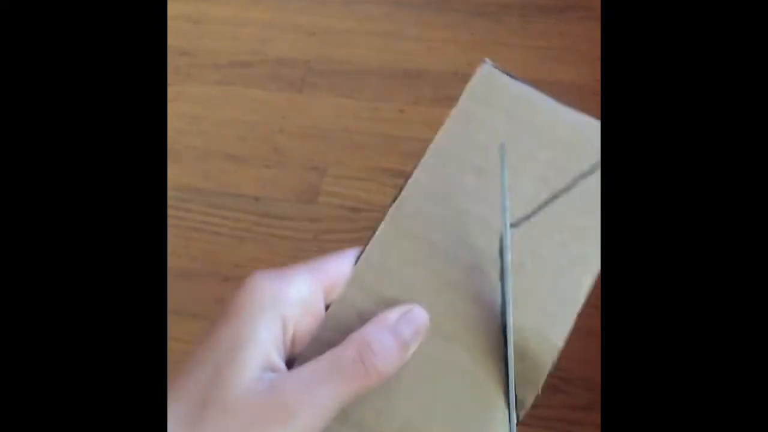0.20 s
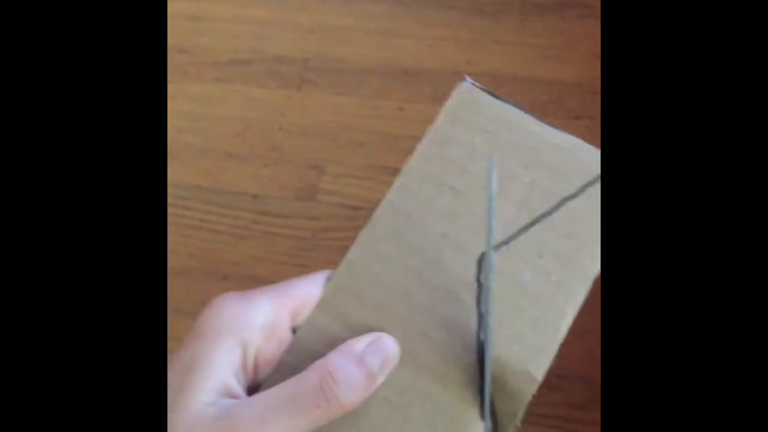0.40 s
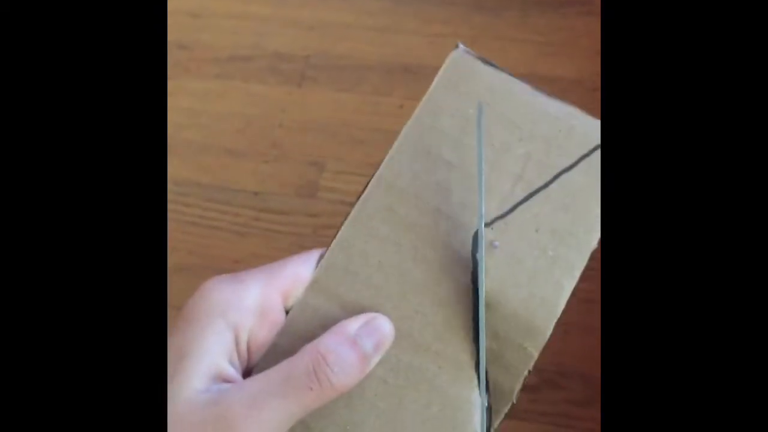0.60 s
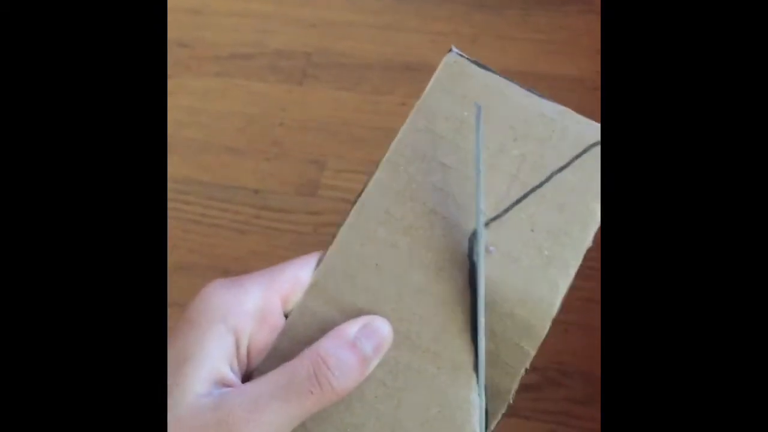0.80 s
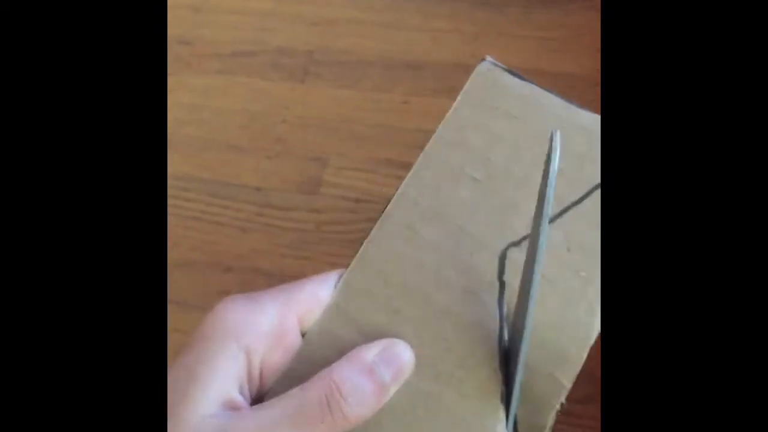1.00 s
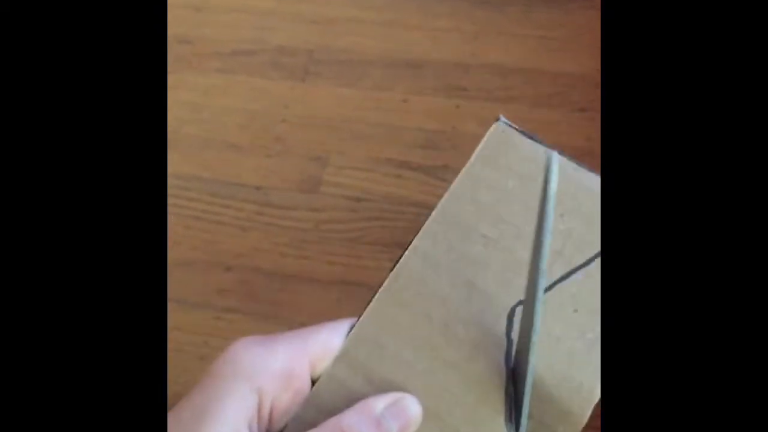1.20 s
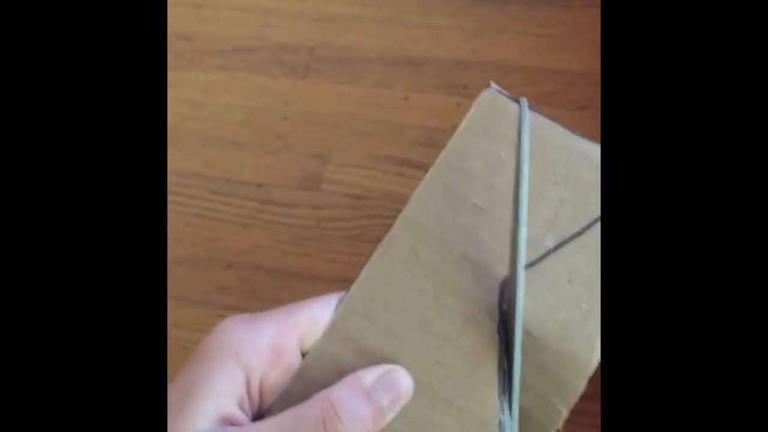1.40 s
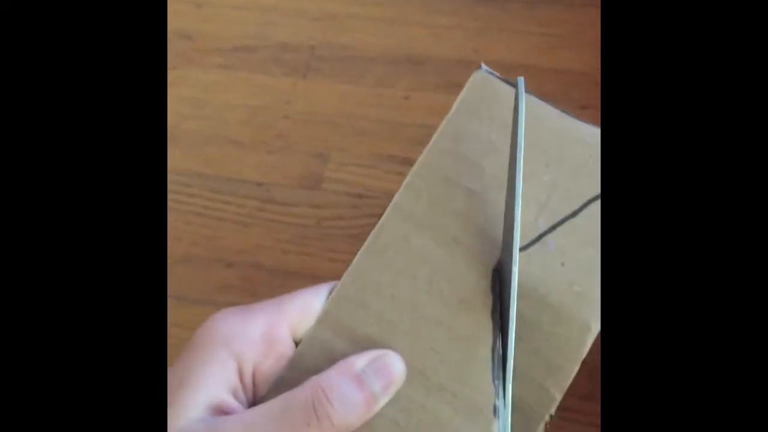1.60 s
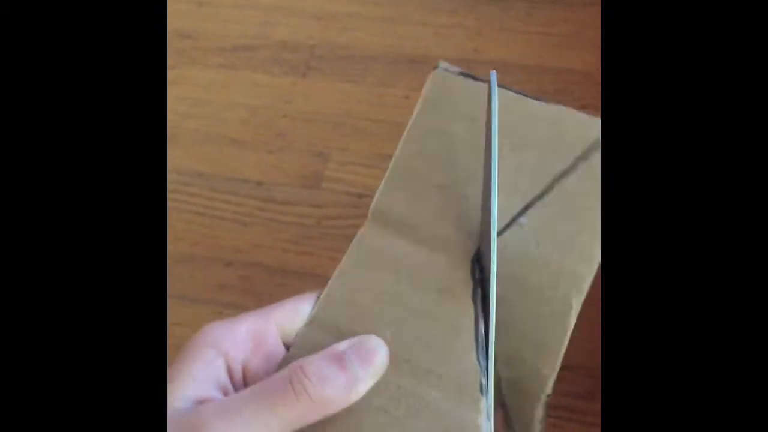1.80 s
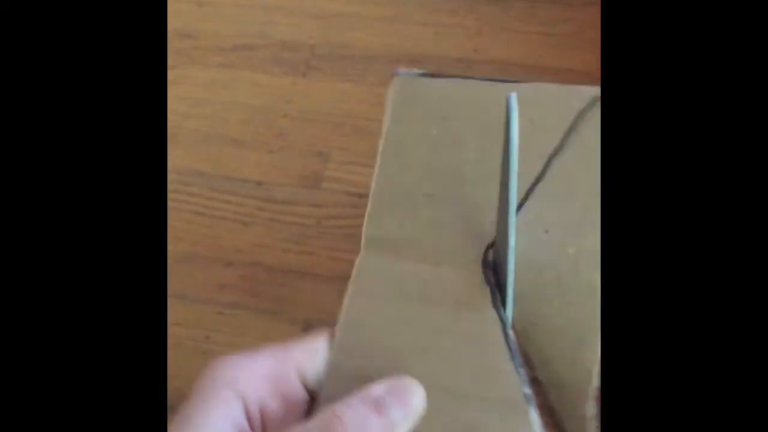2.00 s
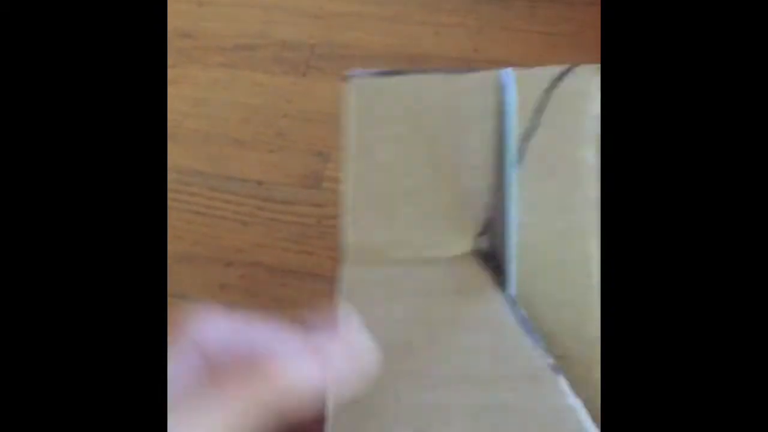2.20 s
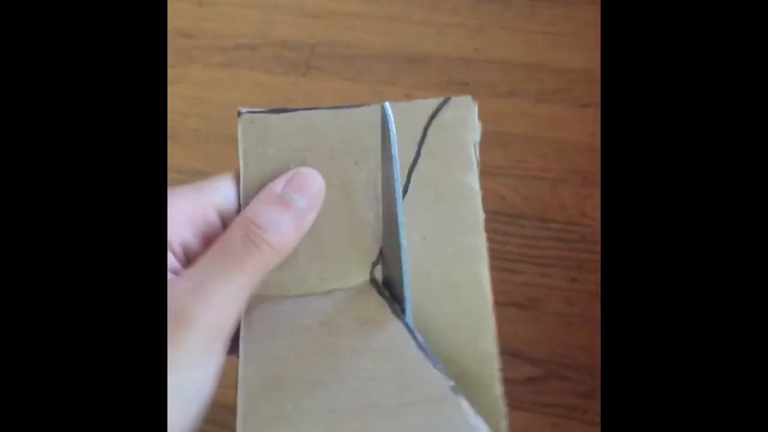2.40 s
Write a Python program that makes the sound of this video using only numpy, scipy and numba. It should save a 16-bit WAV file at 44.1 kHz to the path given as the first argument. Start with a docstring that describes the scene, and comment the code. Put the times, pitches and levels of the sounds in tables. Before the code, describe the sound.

Scissors cutting corrugated cardboard, close up in a small quiet room: a blade scrape, a crackling snip, sliding rasp and a sharp clack, a second crunchier snip, then fingers rub and the board bumps and squeaks.

```python
"""Scissors through corrugated cardboard

Scissors cut board close up in a small quiet room: blades slide in the slit as rasp and hiss made of
random slips, then close in two strokes of crackle, with bursts of fractures ringing the sheet's moving
resonances. Flutes buckle and single fibres tick as filtered noise grains. At the end the hand shifts
its grip: the board bumps as decaying sines, rubs as coloured grain and squeaks as short rising tones."""
import sys
import numpy as np
from scipy import signal
from scipy.fft import rfft, irfft, next_fast_len
from scipy.io import wavfile
from scipy.ndimage import map_coordinates
from numba import njit

SR = 44100
rng = np.random.default_rng(int(sys.argv[2]) if len(sys.argv) > 2 else 0)


def put_to_file(sound):
    """Save the sound as 16-bit audio at rate SR, in the file named by the first command-line argument."""
    columns = np.atleast_2d(sound).T  # one column per channel
    safe = np.clip(columns, -1, 1)
    whole_steps = np.round(safe * 32767)
    wavfile.write(sys.argv[1], SR, whole_steps.astype(np.int16))


N = 110250
T = np.arange(N) / SR  # s
TOP_HZ = 16100
CLUMP_HZ = 318  # knots a second in the cutting, sliding and squeak roughness


def amp(db):
    """Decibels to gain."""
    return 10 ** (np.asarray(db) / 20)


def unit(x):
    """Scale to rms 1."""
    return x / np.sqrt(np.mean(x ** 2) + 1e-20)


def level(strokes, axis=1):
    """Gain per sample from one dB column of each stroke, practically silent between strokes."""
    gain = np.zeros(N)
    for stroke in map(np.array, strokes):
        gain += amp(np.interp(T, stroke[:, 0], stroke[:, axis], left=-140, right=-140))
    return gain


def swells(rows):
    """Gain per sample of bell-shaped swells."""
    return sum(amp(db) * np.exp(-((T - s) / half) ** 2) for s, half, db in rows)


def burst(s, length):
    """Swell, hold and release of one failure; longer ones build up and die more slowly."""
    rise = .00008 + .15 * length  # s
    fall = .0003 + .15 * length  # s
    before, after = np.minimum(T - s, 0), np.maximum(T - s - length, 0)
    return np.exp(before / rise - after / fall)


def wobble(rate):
    """A smooth random curve, rate knots a second."""
    knots = rng.standard_normal(int(N * rate / SR) + 4)
    return map_coordinates(knots, [T * rate])


def clumps(depth_db, rate):
    """Random gain of rms 1 that gathers grains into clumps."""
    return unit(amp(depth_db * wobble(rate)))


def cracks(rate, scatter_db):
    """Tiny fractures or slips, rate a second, at random times with scattered sizes, rms 1."""
    happens = rng.random(N) < rate / SR
    sign = np.sign(rng.standard_normal(N))
    size = amp(scatter_db * np.clip(rng.standard_normal(N), -2, 2))
    return unit(happens * sign * size)


def colour(x, points):
    """Causal filter through (f/Hz, level/dB) points that keeps the power of white noise."""
    size = next_fast_len(N + SR // 2, True) * 2
    hz, db = np.transpose(points)
    log_f = np.log(np.fft.rfftfreq(size, 1 / SR) + 1)
    gain = unit(amp(np.interp(log_f, np.log(hz), db)))
    # Folding the cepstrum makes the filter minimum phase
    cep = irfft(np.log(gain))
    cep[1:size // 2] *= 2
    cep[size // 2 + 1:] = 0
    return irfft(rfft(x, size) * np.exp(rfft(cep)))[:N]


@njit
def resonate(x, turn, q):
    """A resonance whose centre (radians a sample) moves; gain 1 at the peak."""
    y, low, band = np.zeros(len(x)), 0., 0.
    for i in range(len(x)):
        low += turn[i] * band
        band += turn[i] * (x[i] - low - band / q)
        y[i] = band / q
    return y


def steep_resonance(x, hz, q):
    """The same moving resonance twice in a row, for steep skirts."""
    turn = 2 * np.pi * hz / SR
    return resonate(resonate(x, turn, float(q)), turn, float(q))


# The board stiffens as it is bent, so its creak rises: (t/s, f/Hz)
CREAK_PITCH = [(2.12, 368), (2.21, 710)]


def creak(grain):
    """Rubbing grain excites a broad resonance that climbs as the board bends."""
    return amp(14.5) * steep_resonance(grain, np.interp(T, *np.transpose(CREAK_PITCH)), q=1.43)


# Dull grain, one list a stroke: first a grainy tail fading after the blades' jerk, then fingers rubbing the
# board: (t/s, level before colour/dB)
GRAIN_STROKES = [
    [(1.13, -56), (1.23, -70.5), (1.27, -52), (1.3, -86)],
    [(2.0, -60.5), (2.065, -60), (2.075, -42), (2.12, -46), (2.15, -41), (2.2, -43.5), (2.27, -69.5)],
]
# Fingertips brushing lightly: (middle t/s, half length/s, level before colour/dB)
BRUSH_SWELLS = [(.01, 0.038, -53), (.09, .02, -53), (2.04, 0.014, -51.5), (2.351, .041, -55)]
# Dull colour of the rubbing grain: (f/Hz, relative level/dB)
GRAIN_COLOUR = [(100, 4.5), (400, -5), (1050, -0.5), (1700, -5), (3000, -3), (5000, -13.5), (8500, -10),
                (16000, -18.5)]
# Airy colour of the light brushes: (f/Hz, relative level/dB)
BRUSH_COLOUR = [(500, -8.5), (2000, -3.5), (5000, -14.5), (8500, -5), (16000, -4)]


def rubbing():
    """A dull grainy tail fades after the blades' jerk; later fingers drag on the paper face, or only brush it;
    the board creaks under the last rub."""
    def grain():
        return cracks(7000, scatter_db=5.5) * clumps(2.4, 180)

    drag = colour(level(GRAIN_STROKES) * grain(), GRAIN_COLOUR)
    brush = colour(swells(BRUSH_SWELLS) * grain(), BRUSH_COLOUR)
    return drag + creak(level(GRAIN_STROKES[1:]) * grain()) + brush


# Blades sliding in the slit, one list a slide: (t/s, rasp level before trim/dB, hiss level before trim/dB)
SLIDE_STROKES = [
    [(.186, -47.5, -55), (.2, -36.5, -41), (.28, -37.5, -45), (.325, -34.5, -43), (.365, -34, -52.5),
     (.4, -41.5, -69), (.43, -72, -82)],
    [(.916, -47, -49.5), (.934, -29.5, -36.5), (.952, -39, -63), (.98, -30, -52), (1.025, -39, -43.5),
     (1.05, -44.5, -56), (1.072, -69, -84)],
    [(1.097, -44, -62), (1.107, -21.5, -24), (1.116, -23.5, -29), (1.122, -19, -25), (1.137, -57, -64)],
    [(1.85, -65, -65), (1.91, -52, -46), (1.925, -64.5, -66), (1.953, -36.5, -40.5), (1.982, -41.5, -37.5),
     (2.003, -67, -68)],
]
# The blade binding in the slit: (middle t/s, half length/s, level before colour/dB)
CHATTER_SWELLS = [(.331, 0.032, -35)]
# Colour of the rasp in the board: (f/Hz, relative level/dB)
RASP_COLOUR = [(40, -18.5), (110, -16.5), (450, -30), (680, -7.5), (880, -16.5), (1150, -5.5), (1380, -6),
               (1800, -2.5), (2300, -8.5), (3200, -13), (4600, -19), (9000, -24.5)]
# Colour of the hiss at the surface: (f/Hz, relative level/dB)
HISS_COLOUR = [(1500, -78), (4500, -1), (8000, 5), (9500, 7.5), (10800, -0.5), (13500, 0.5), (16000, -11)]
# Colour of the binding blade: (f/Hz, relative level/dB)
CHATTER_COLOUR = [(1400, -32.5), (2200, 1), (2600, -10.5), (3400, -8.5), (4600, -39.5)]
RASP_TRIM_DB, HISS_TRIM_DB = -3.5, -1


def sliding():
    """Steel drags over the cut edges: slips rasp in the board, hiss on top, chatter where it binds."""
    def slips():
        return cracks(11000, scatter_db=3) * clumps(2.2, CLUMP_HZ)

    rasp = amp(RASP_TRIM_DB) * colour(level(SLIDE_STROKES) * slips(), RASP_COLOUR)
    chatter = colour(swells(CHATTER_SWELLS) * slips(), CHATTER_COLOUR)
    hiss = amp(HISS_TRIM_DB) * colour(level(SLIDE_STROKES, axis=2) * slips(), HISS_COLOUR)
    return rasp + chatter + hiss


# The board buckling with a dull crunch: (t/s, length/s, level before colour/dB)
BUCKLE_EVENTS = [(0.224, 0.0059, -47), (1.113, 0.011, -32.5), (1.578, .003, -38.5), (1.629, 0.0047, -29.5),
                 (1.652, 0.11, -45.5), (1.703, 0.0052, -34), (1.746, 0.0027, -40), (1.964, 0.032, -50),
                 (2.459, 0.0098, -46)]
# Colour of the hollow board: (f/Hz, relative level/dB)
HOLLOW_COLOUR = [(40, -10), (130, 4), (450, -4.5), (750, 1), (1200, -4), (2000, -14.5), (3500, -20.5)]


def buckling():
    """Flutes fold flat in bursts of fractures and sound the hollow board."""
    folding = sum(amp(db) * burst(s, length) for s, length, db in BUCKLE_EVENTS)
    return colour(folding * cracks(6000, scatter_db=2.5), HOLLOW_COLOUR)


# Colour of fractures in the stiff board: (f/Hz, relative level/dB)
BOARD_COLOUR = [(600, -3.5), (900, -8.5), (1300, -6.5), (1800, 3), (2400, -1.5), (3100, 1.5), (4500, -10.5),
                (8000, -7.5), (16000, -23.5)]


def crunch(force):
    """The stiff board radiates small fractures only above its low cut at 800 Hz."""
    low_cut = signal.butter(6, 800, "high", fs=SR, output="sos")
    return signal.sosfilt(low_cut, colour(force, BOARD_COLOUR))


# Bright colour of parting fibres: (f/Hz, relative level/dB)
FIBRE_COLOUR = [(1500, -44), (4000, 4), (5000, -2), (6200, 5.5), (7200, 3), (8600, 11), (10500, 7.5),
                (13000, 9.5), (16000, 2.5)]


def splinter(force):
    """The fibres themselves radiate the treble of each fracture."""
    return colour(force, FIBRE_COLOUR)


# Single fibres cracking: (t/s, strength before colour/dB, treble relative to strength/dB)
FIBRE_TICKS = [(0.2251, -5, -26), (0.261, -16, -6), (.4818, -9, -6), (.708, -7.5, -2), (0.9728, -9.5, -14),
               (1.4822, -14, 10), (1.5792, -9, 5.5), (1.7252, -17, 7.5), (2.0707, -28.5, 13),
               (2.0894, -17, -15), (2.4582, -12, -5.5)]


def ticks():
    """Single fibres part with a sharp crack and brief splintering, too light to ring the sheet."""
    body, treble, t = np.zeros(N), np.zeros(N), T[:SR // 100]
    for s, db, treble_db in FIBRE_TICKS:
        tail = rng.standard_normal(len(t)) * np.exp(-t / .0005) * (t > 0)
        crack = (t == 0) + amp(-10) * tail
        crack *= amp(db) / np.linalg.norm(crack)
        start = round(s * SR)
        body[start:][:len(t)] += crack
        treble[start:][:len(t)] += amp(treble_db) * crack
    return crunch(body) + splinter(treble)


# The sheet's main resonance as the blades advance: (t/s, f/Hz)
SHEET_PITCH = [(.48, 690), (.55, 760), (.61, 830), (.655, 1020), (.72, 1060), (.755, 1000), (1.42, 950),
               (1.45, 1050), (1.52, 1070), (1.6, 965)]


def sheet(force, ratio, q):
    """One bending resonance of the sheet, at a fixed ratio to its moving main pitch."""
    return steep_resonance(force, ratio * np.interp(T, *np.transpose(SHEET_PITCH)), q)


# Flutes giving way:
# (t/s, length/s, level before colour/dB, treble over that level/dB, sheet ring over that level/dB)
FLUTE_SNAPS = [(0.554, 0.017, -38, 8, -14), (0.604, 0.019, -34.5, -12, 1.5), (.633, 0.0095, -27.5, 0, -3.5),
               (0.65, 0.01, -40.5, -12, 6), (0.6903, 0.0061, -35, -9, 6.5), (.7156, 0.0065, -33.5, -4, 0.5),
               (0.746, 0.0071, -42.5, -3, -5), (1.364, 0.0064, -52, 8.5, -23),
               (1.4153, 0.0068, -35, 4.5, 0), (1.4416, 0.0032, -39.5, 3, 1), (1.4603, 0.0045, -35, 0, -3),
               (1.487, 0.0084, -35, 3.5, 2.5), (1.5122, 0.0048, -34.5, -2.5, 9),
               (1.525, 0.014, -44, 4.5, 2), (1.56, 0.0061, -41.5, -1, 7), (1.6312, 0.0041, -20.5, -1.5, 0),
               (1.7017, 0.0049, -29.5, 2, 1)]


def snap_gains():
    """Gains of the bursting flutes for the board's body, the treble and the sheet's ring."""
    gains = np.zeros((3, N))
    for s, length, db, treble_db, ring_db in FLUTE_SNAPS:
        gains += np.outer(amp(db + np.array([0, treble_db, ring_db])), burst(s, length))
    return gains


# Closing strokes of the blades, one list a stroke: (t/s, crackle level before trim/dB)
CUT_STROKES = [
    [(.45, -63.5), (.475, -47), (.50, -47.5), (.54, -40.5), (.62, -40), (.68, -46.5), (.73, -46),
     (.77, -51.5), (.805, -68)],
    [(1.375, -63), (1.41, -46), (1.5, -47), (1.6, -50.5), (1.65, -43.5), (1.69, -47.5), (1.742, -46),
     (1.765, -68), (1.82, -78)],
]
# Higher resonances of the sheet: (ratio to the main one, gain/dB)
SHEET_OVERTONES = [(1.501, 5.5), (3.05, 3.5)]
CUT_TRIM_DB, CUT_TREBLE_DB = -2, 3
SHEET_DB, FLEX_DB, THUD_DB = 15, 11.5, 12.5
SHEET_Q, FLEX_Q = 5, 3.6
THUD_HZ = 157


def cutting():
    """Crackle and bursts of fractures sound directly and ring the sheet, which also flexes and thuds."""
    effort = amp(CUT_TRIM_DB) * level(CUT_STROKES) * clumps(2.5, CLUMP_HZ)
    body, treble, ring = snap_gains()

    def crackle():
        return effort * cracks(3600, scatter_db=6)

    def tear():
        return cracks(14000, scatter_db=2.5) * clumps(3, 700)

    direct = crunch(crackle() + body * tear())
    main = amp(SHEET_DB) * sheet(crackle() + ring * tear(), 0.98, SHEET_Q)
    flex = amp(FLEX_DB) * sheet(crackle() + ring * tear(), .245, FLEX_Q)
    high = np.zeros(N)
    for ratio, db in SHEET_OVERTONES:
        high += amp(db) * sheet(crackle() + body * tear(), ratio, SHEET_Q)
    thud_filter = signal.butter(6, THUD_HZ, fs=SR, output="sos")
    thud = amp(THUD_DB) * signal.sosfilt(thud_filter, crackle())
    fibres = splinter(amp(CUT_TREBLE_DB) * crackle() + treble * tear())
    return direct + main + flex + high + thud + fibres


# The sheet flapping or thumping in the hand: (t/s, f/Hz, level before rise and decay/dB, t60/s)
SHEET_BUMPS = [(1.118, 89, -19, 0.046), (1.418, 225, -32.5, 0.055), (1.635, 75, -38.5, 0.27),
               (2.04, 49.4, -33.5, 0.26), (2.082, 46.3, -28, .12), (2.466, 106, -34, 0.11)]


def bumps():
    """The whole sheet swings freely as a sine and dies away."""
    out = np.zeros(N)
    for s, hz, db, t60 in SHEET_BUMPS:
        t = np.maximum(T - s, 0)
        rise = 1 - np.exp(-t / .003)
        decay = np.exp(-np.log(1000) * t / t60)
        out += amp(db) * np.sin(2 * np.pi * hz * t) * decay * rise
    return out


# The board catching and squeaking:
# (middle t/s, half length/s, f at the middle before wander/Hz, peak level before roughness/dB)
BOARD_SQUEAKS = [(1.892, .02, 780, -52.5), (2.09, 0.0051, 445, -33.5), (2.151, 0.0039, 1040, -39),
                 (2.182, .006, 630, -34.5), (2.2004, 0.0054, 703, -21), (2.467, 0.0056, 514, -43.5)]
SQUEAK_RISE_HZ_PER_S = 3000


def squeaks():
    """Brief stick-slip tones whose unsteady pitch climbs."""
    out = np.zeros(N)
    wander = .55 * wobble(260)  # phase, radians
    for s, half, hz, db in BOARD_SQUEAKS:
        t = T - s
        phase = 2 * np.pi * (hz + SQUEAK_RISE_HZ_PER_S * t / 2) * t + wander
        out += amp(db) * np.exp(-(t / half) ** 2) * np.sin(phase)
    roughness = amp(1 * wobble(CLUMP_HZ))  # 1 dB deep
    return out * roughness


ROOM_T60_S, ROOM_TOP_HZ = 0.17, 5270


def room(x):
    """A short dull answer from the table and walls: decaying noise through a gentle treble cut."""
    t = T[:SR // 2]
    decay = np.exp(-np.log(1000) * t / ROOM_T60_S)
    tail = rng.standard_normal(len(t)) * decay * (t > .003)
    tail = signal.lfilter(*signal.butter(1, ROOM_TOP_HZ, fs=SR), tail)
    return signal.fftconvolve(x, tail / np.linalg.norm(tail))[:N]


# Colour of the room's low rumble: (f/Hz, relative level/dB)
FLOOR_COLOUR = [(20, -13), (45, -5.5), (80, .5), (130, -2.5), (220, -16.5), (450, -25.5), (800, -21.5),
                (16000, -33)]
ROOM_DB = -18.5
FLOOR_DB = -60.5  # before the low cut


def scene():
    """Scissors, board and hand over the room's low rumble."""
    near = rubbing() + sliding() + buckling() + ticks() + cutting() + bumps() + squeaks()
    rumble = amp(FLOOR_DB) * colour(rng.standard_normal(N), FLOOR_COLOUR)
    return (near + amp(ROOM_DB) * room(near) + rumble)[None]


def record(dry):
    """The recorder rolls off the deepest bass and keeps nothing above its band limit."""
    size = next_fast_len(N + SR // 2)
    low_cut = signal.butter(4, 42, "high", fs=SR, output="sos")
    dry = signal.sosfilt(low_cut, dry)
    in_band = np.fft.rfftfreq(size, 1 / SR) < TOP_HZ
    return irfft(rfft(dry, size) * in_band, size)[:, :N]


dry = scene()
out = record(dry)
put_to_file(out)
```